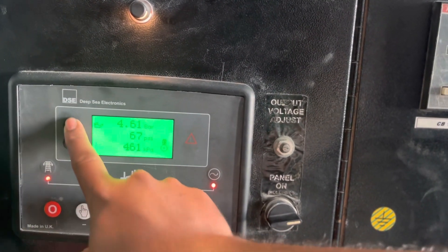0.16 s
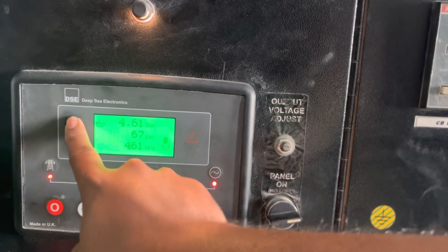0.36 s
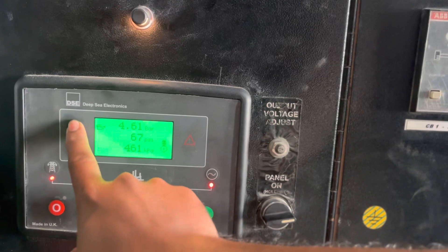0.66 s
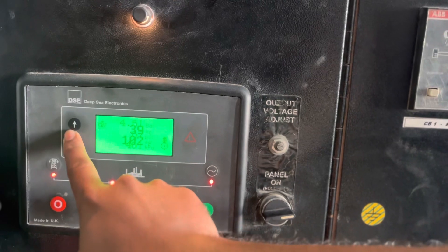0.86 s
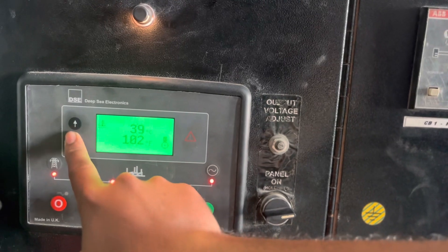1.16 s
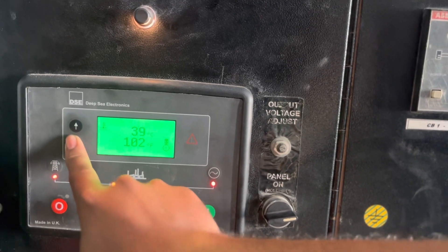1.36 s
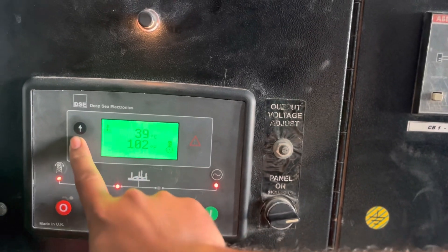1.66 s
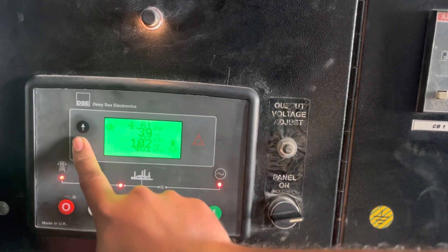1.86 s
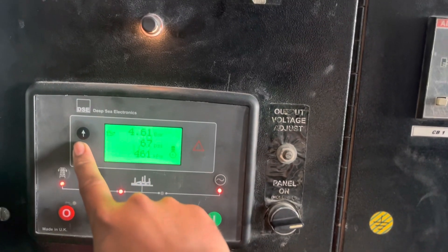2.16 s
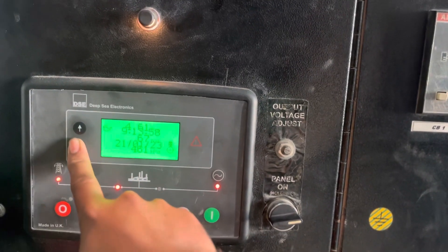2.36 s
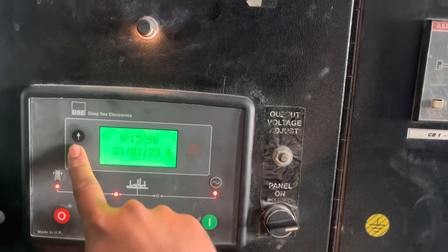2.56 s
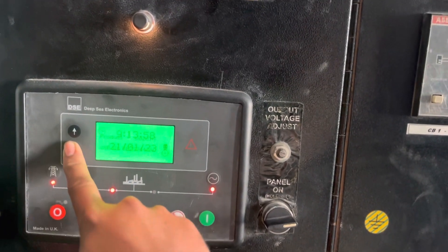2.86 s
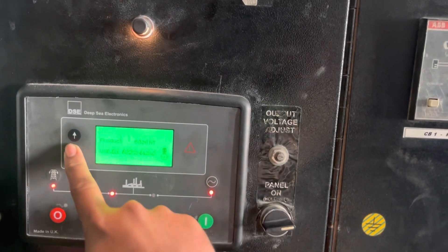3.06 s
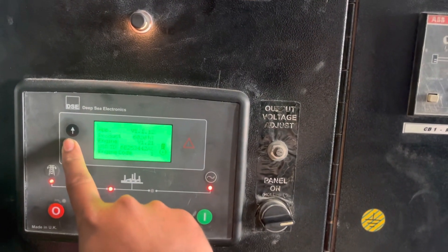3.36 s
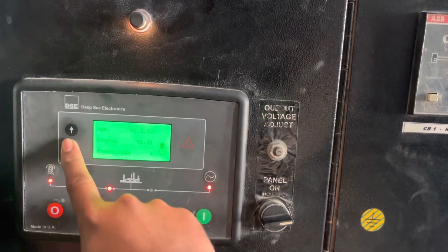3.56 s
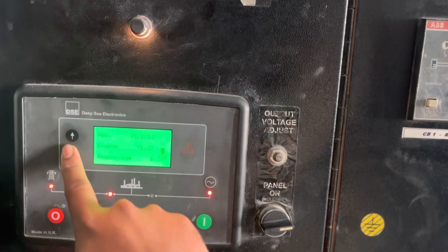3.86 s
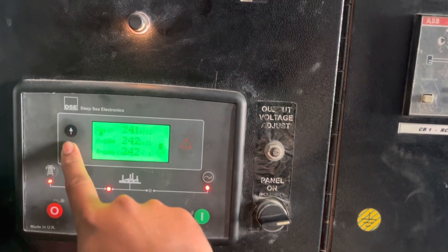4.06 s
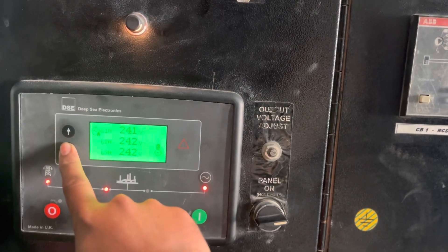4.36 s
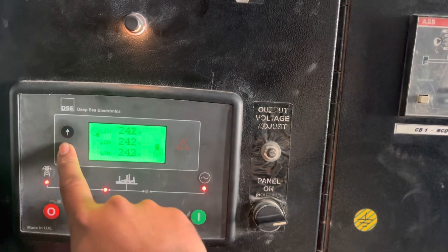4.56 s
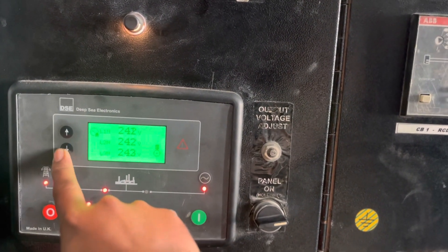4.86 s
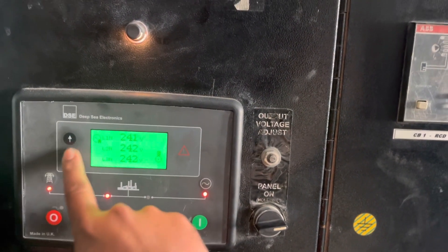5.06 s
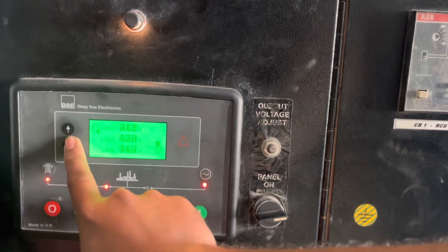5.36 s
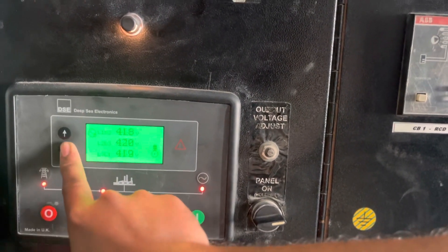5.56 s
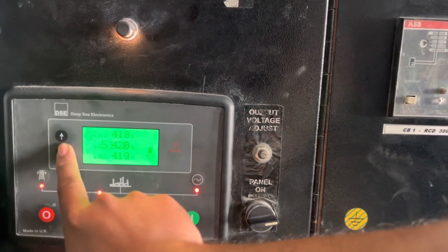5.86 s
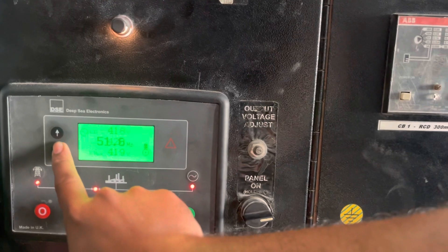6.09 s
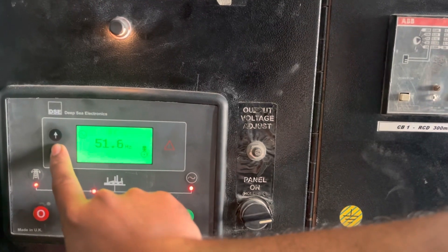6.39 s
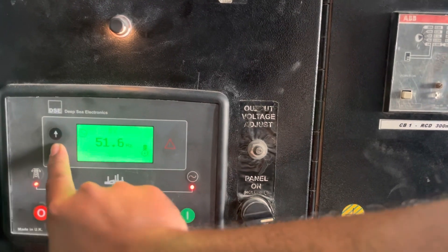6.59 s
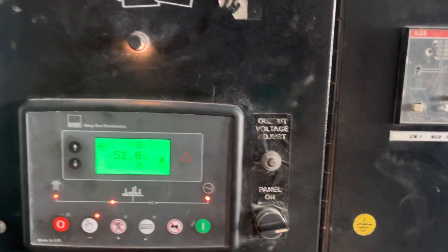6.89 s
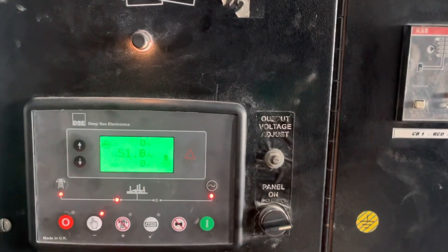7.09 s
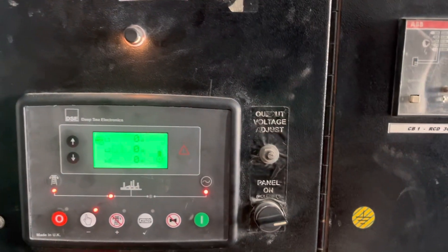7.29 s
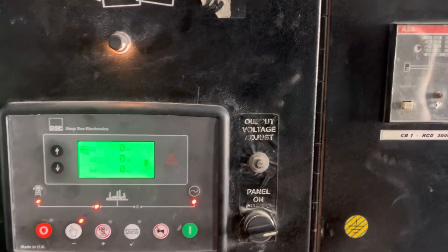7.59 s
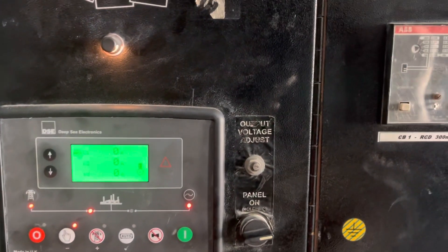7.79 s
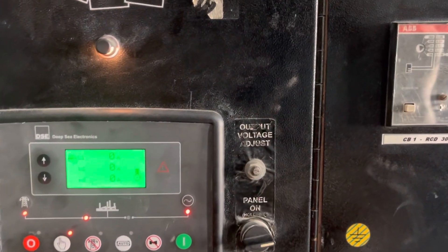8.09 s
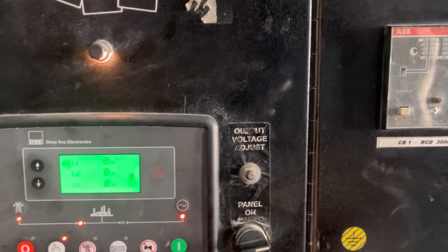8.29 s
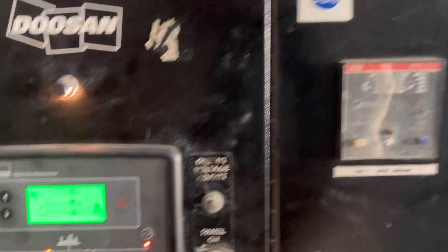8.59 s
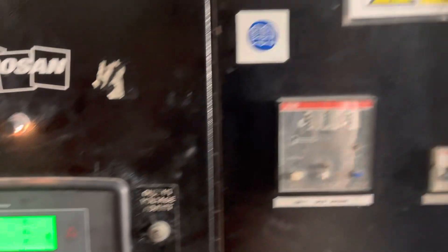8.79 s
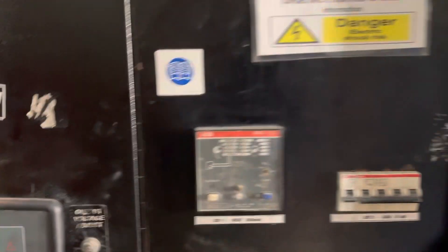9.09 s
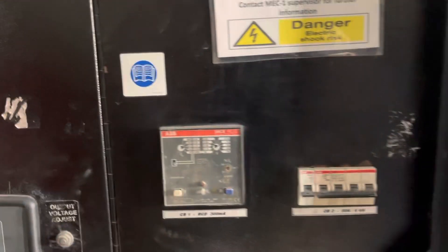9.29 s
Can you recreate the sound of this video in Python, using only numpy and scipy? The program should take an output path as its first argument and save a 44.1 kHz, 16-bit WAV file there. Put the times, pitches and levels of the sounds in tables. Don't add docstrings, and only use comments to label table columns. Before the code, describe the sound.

Close handheld stereo capture of a running diesel generator: steady low firing tones, coarse mechanical clatter, a wavering fan tone and turbulent air. A fine, bright metallic rattle repeats about twenty-six times a second, blending into a buzz. Pitch stays even throughout. After a faint tick and brushing near the seventh second, the microphone moves and the boom weakens during the last second.

```python
import sys
import numpy as np
from scipy import signal
from scipy.fft import rfft, irfft, next_fast_len
from scipy.io import wavfile
from scipy.ndimage import uniform_filter1d

SR = 44100
rng = np.random.default_rng(int(sys.argv[2]) if len(sys.argv) > 2 else 0)


def bounce(signal):
    frames = np.transpose(np.atleast_2d(signal))
    limited = np.clip(frames, -1, 1)
    pcm = np.round(limited * 32767).astype(np.int16)
    wavfile.write(sys.argv[1], SR, pcm)


def volts_from_decibels(level):
    exponent = np.asarray(level, float) / 20
    return 10 ** exponent


N = 416304
T = np.arange(N) / SR
CYCLE_HZ = 12.8997
LEFT_RIGHT = np.array([[1], [-1]])

# multiple, left level/dB, right level/dB
STRONG_ORDERS = [(4, -24, -24), (6, -33, -34), (7, -42, -41), (8, -28, -27), (11, -44, -43), (12, -38, -36),
                 (16, -30, -30), (17, -38, -37), (18, -38, -39), (20, -34, -31), (22, -43, -45),
                 (24, -50, -41), (28, -34, -31), (30, -32, -29), (31, -46, -37), (32, -30, -31),
                 (33, -39, -37), (34, -30, -29), (35, -45, -41), (36, -37, -30), (37, -45, -41),
                 (38, -31, -28), (39, -42, -38), (40, -30, -27), (41, -46, -43), (42, -39, -42),
                 (43, -42, -39), (44, -46, -40), (46, -46, -42), (50, -52, -42)]
# multiple, left level/dB, right level/dB
PANEL_ORDERS = [(53, -54.5, -51), (56, -50.5, -47), (65, -52, -51), (75.9, -55, -54), (104, -57, -58.5),
                (122.2, -58, -55.5)]
# t/s, share 0-1
SHIFT = [
    (5.5, 0),
    (6.7, 0.5),
    (7.2, 0.8),
]
# f/Hz, share
BOOM_SHARE = [(52, 0.043), (210, 0.49), (350, 0), (400, 1.17), (500, 1.47), (700, 0), (1200, 0)]
# f/Hz, coherence (clipped to 0-1 in the noise
COHERENCE = [(60, 1), (150, 3.5), (300, -1), (450, 2.7), (700, 0.95), (1200, -0.09), (1600, 0.56),
             (2600, 0.6), (3500, -0.08), (4700, 0), (6400, 0.44), (7800, 4.5), (8500, 8), (16000, -0.5)]


def evened(x):
    return x / np.sqrt(np.mean(abs(x) ** 2) + 1e-20)


def read(points, hz):
    f, value = np.transpose(points)
    return np.interp(np.log(hz + 1), np.log(f + 1), value)


def curve(points, t):
    return np.interp(t, *np.transpose(points))


def drift(per_s):
    t = np.arange(0, T[-1] + 1, 1 / per_s)
    a, b = rng.standard_normal((len(t), 2)).T
    coarse = T[::64]
    wander = np.interp(coarse, t, a) + 1j * np.interp(coarse, t, b)
    return np.repeat(evened(wander), 64)[:N]


def resonate(x, hz, width):
    r = np.exp(-np.pi * width / SR)
    return signal.lfilter([1 - r, 0, r - 1], [1, -2 * r * np.cos(2 * np.pi * hz / SR), r * r], x)


def ports(hz):
    # f/Hz, phase by which left leads/rad
    left_leads = [(50, -.2), (150, -.2), (230, -.5), (360, .4), (500, 1.15), (1900, 1.5), (2600, -.4),
                  (3500, 1.9), (4700, -.6), (5600, -3.1), (7200, -1.9), (8200, 0), (9900, 0), (11700, 3.14),
                  (13700, 3.14), (15300, 6.1)]
    return np.exp(.5j * read(left_leads, hz) * LEFT_RIGHT)


def boom_db(t):
    # t/s, level against usual/dB
    boom_level = [(0.0, -0.4), (0.6, -1.2), (1.1, 0), (2.9, 0), (3.4, 0.3), (4.5, 0), (6.7, 0),
                  (8.73, -3.5), (9.02, -6), (9.44, -5.5)]
    return curve(boom_level, t)


def hum_db(t):
    slide_s, slide_length_s = 8.6, .37
    shift_s = SHIFT[1][0]
    shifted = np.clip((t - shift_s) / (slide_s - shift_s), 0, 1)
    slid = np.clip((t - slide_s) / slide_length_s, 0, 1)
    return 2.1 * shifted - 4.5 * slid


def crank():
    # t/s, lead/ms
    clock_lead = [(0.0, -32.57), (1.2, -32.82), (3.1, -32.07), (4.1, -32.73), (5.7, -32.25), (6.6, -32.52),
                  (7.3, -32.25), (8.3, -32.5), (9.15, -33.5), (9.44, -33.55)]
    return CYCLE_HZ * (T + curve(clock_lead, T) / 1000)


def noise(spectrum, patchy_db, follow):
    # f/Hz, level difference/dB
    port_lean = [(60, -0.5), (110, -5), (200, -3), (380, 1), (700, -2.5), (1290, -3.5), (2380, -3),
                 (4400, -4), (8120, -2.5), (15000, -2)]
    frames, hz = N // 256 + 5, np.fft.rfftfreq(1024, 1 / SR)
    a, b, c, d, patches = rng.standard_normal((frames, 513, 5)).T
    patches = uniform_filter1d(patches, size=10, axis=0)
    patches = evened(uniform_filter1d(patches, size=12, axis=1))

    same = np.clip(read(COHERENCE, hz), 0, 1)[:, None]
    left = a + 1j * b
    right = same * left + np.sqrt(1 - same ** 2) * (c + 1j * d)
    z = np.array([left, right])
    z *= (ports(hz) * volts_from_decibels(.5 * read(port_lean, hz) * LEFT_RIGHT))[:, :, None]

    moved_db = follow * read(BOOM_SHARE, hz)[:, None] * boom_db(np.arange(frames) * 256 / SR)
    z *= volts_from_decibels(read(spectrum, hz)[:, None] + patchy_db * patches + moved_db)
    return evened(signal.istft(z, nperseg=1024, noverlap=768)[1][:, :N])


def firing(cycles):
    # t/ms, signed strength
    turn_blows = [(3.17, 0.53), (8.16, -0.96), (16.8, -0.31), (30.06, 0.7), (34.49, -0.7), (36.78, 1.0)]
    # t/ms, signed strength
    flipping_blows = [(9.01, -0.68), (18.5, -0.63), (26.99, 1.0), (34.19, 0.73)]
    slow, boom, hum = cycles[::8], boom_db(T[::8]), hum_db(T[::8])
    out = 0
    for k, left_db, right_db in STRONG_ORDERS + PANEL_ORDERS:
        k = round(k)
        hz = k * CYCLE_HZ
        ms, strength = np.transpose(flipping_blows if k % 2 else turn_blows)
        start = np.angle(np.sum(strength * np.exp(-2j * np.pi * hz * ms / 1000)))
        sway = 1 + min(0.0014 * k, .08) * drift(5.5)[::8]
        tone = sway * np.exp(2j * np.pi * k * slow + 1j * start)
        place_db = hum if k == 8 else read(BOOM_SHARE, hz) * boom
        out = out + (ports(hz) * volts_from_decibels([[left_db], [right_db]]) * tone).real * volts_from_decibels(place_db)
    return np.sqrt(2) * signal.resample_poly(out, 8, 1, axis=1)[:, :N]


def valves(cycles, count=2):
    # f/Hz, level of each/dB
    knock_levels = [(38, -52), (200, -59), (400, -43), (600, -48), (680, -54), (850, -52), (1050, -59.5),
                    (1220, -62), (1340, -60.5), (1580, -61), (1900, -62.5), (2800, -77.5), (4500, -82),
                    (7000, -130)]
    k = np.arange(4097)
    hz = k * CYCLE_HZ
    strong = np.isin(k, np.round(np.transpose(STRONG_ORDERS + PANEL_ORDERS)[0]))
    height = volts_from_decibels(read(knock_levels, hz) + 1.8 * rng.standard_normal((2, 4097)))
    height = height * ~strong * (k > 2)
    same = read(COHERENCE, hz)
    apart = np.sqrt(1 - np.clip(same, 0, 1) ** 2)

    out, at = np.zeros((2, N)), cycles % 1 * 8192
    for n in range(count):
        shared, own = np.exp(2j * np.pi * rng.random((2, 4097)))
        turn = np.array([shared, same * shared + apart * own])
        waveform = irfft(height * turn * ports(hz), 8192) * 4096 * np.sqrt(2)
        weight = .85 if n == 0 else .45 * drift(1.516).real
        out += weight * np.array([np.interp(at, np.arange(8192), row, period=8192) for row in waveform])
    return out * volts_from_decibels(0.3 * boom_db(T))


def fan():
    fan_hz = 36.67
    # multiple, level/dB, change after the shift/dB
    fan_orders = [(2, -42, -24), (3, -46, -3), (4, -39, 1.5), (5, -44, 0.5), (6, -40.5, 2), (8, -54.5, 2)]
    out, slow = 0, T[::8]
    for k, db, moved_db in fan_orders:
        waver = 1 + .3 * drift(1.2)[::8]
        tone = waver * np.exp(2j * np.pi * (k * fan_hz * slow + rng.random()))
        out = out + (ports(k * fan_hz) * tone).real * volts_from_decibels(db + moved_db * curve(SHIFT, slow))
    return np.sqrt(2) * signal.resample_poly(out, 8, 1, axis=1)[:, :N]


def rumble(cycles):
    # f/Hz, spectral level/dB
    rumble_spectrum = [(25, -26), (45, -25), (75, 6.5), (150, 0.5), (215, 0.5), (310, -6), (400, 0.5),
                       (480, 2.5), (600, -8), (800, -11), (1300, -26), (2500, -44)]
    throb = volts_from_decibels(0.36 * np.cos(4 * np.pi * (cycles - .05)))
    return volts_from_decibels(-31.5) * throb * noise(rumble_spectrum, patchy_db=2.0, follow=0.21)


def hiss():
    # f/Hz, spectral level/dB
    hiss_spectrum = [(500, -29), (900, 1), (1250, -7.5), (1600, -2.5), (2300, -10.5), (3600, -10),
                     (5500, -16.5), (7000, -20), (9100, -21.5), (10500, -24.5), (12500, -28), (16000, -38)]
    return volts_from_decibels(-40.5) * noise(hiss_spectrum, patchy_db=1.5, follow=0.37)


def rattle_db():
    frees_s, freeing_s = 0.65, 0.53
    stuck = np.exp(-np.maximum(T - frees_s, 0) / freeing_s)
    return -47 - 9 * stuck + 0.87 * boom_db(T) * curve(SHIFT, T)


def rattle(cycles):
    # f/Hz, width/Hz, level/dB, right minus left/dB, change after the shift/dB
    ring_modes = [(1570, 98, 1, 8, -15), (2660, 270, -5.5, 3, -6), (3310, 67, -8.5, -7, 3),
                  (3697, 85, -1.5, 3, -0.5), (3760, 1340, 5, 7.5, 0), (4560, 140, -3.5, 8, -6),
                  (4925, 66, -0.5, 2, -7), (5170, 800, -1, 8.5, 5), (6880, 660, -8, -7, -1),
                  (7320, 1260, -1, -1.5, 0.5), (8580, 1300, -4.5, 0, 1)]
    # t/ms, level/dB
    bounces = [
        (0, -0.5),
        (1.6, 0),
        (3.2, -4),
        (5.5, -3),
        (9.2, -2),
        (12, -7),
    ]
    hits = np.flatnonzero(np.diff(np.floor(2 * cycles)))
    chance = rng.standard_normal((len(hits), 2 * len(bounces) + 1))
    strength = volts_from_decibels(1.5 * chance[:, -1])
    knocks, starts = np.zeros(N + SR), np.zeros(N)
    starts[hits] = strength
    for n, (ms, db) in enumerate(bounces):
        bounce_ms = ms + .045 * (n > 0) * chance[:, 2 * n]
        at = hits + np.abs(bounce_ms * SR / 1000).astype(int)
        knocks[at] += strength * volts_from_decibels(db + 1.1 * chance[:, 2 * n + 1])

    shared, left, right = rng.standard_normal((3, N))
    buzz_decay = signal.lfilter([1], [1, -np.exp(-1 / (0.011 * SR))], starts)
    buzz = buzz_decay * (shared + 0.91 * np.array([left, right]))
    drive = evened(knocks[:N]) * 0.87 + evened(buzz) * 0.57

    out, moved = 0, curve(SHIFT, T)
    for hz, width, db, lean_db, moved_db in ring_modes:
        ring = evened(resonate(resonate(drive, hz, 3 * width), hz, width))
        out = out + volts_from_decibels([[db - lean_db / 2], [db + lean_db / 2]]) * volts_from_decibels(moved_db * moved) * ring

    size = next_fast_len(N)
    hz = np.fft.rfftfreq(size, 1 / SR)
    out = irfft(rfft(out, size) * ports(hz) / (1 + (hz / 11000) ** 12), size)[:, :N]
    return evened(out) * volts_from_decibels(rattle_db())


def touches():
    # t/s, level/dB, f/Hz, length/s, left minus right/dB
    hand_touches = [
        (6.737, -53, 10500, 0.0044, -1),
        (6.77, -45.5, 1120, .13, -4),
        (6.788, -47, 810, 0.11, 0),
        (6.843, -57, 3300, .07, 4),
        (7.025, -50, 2280, .04, 12),
        (7.027, -51, 3450, .03, 6),
    ]
    out = np.zeros((2, N))
    for s, db, hz, length, lean_db in hand_touches:
        n, at = round(length * SR), round(s * SR)
        width = min(330 * (.035 / length) ** 2, 8000)
        grit = rng.standard_normal(8000)
        puff = evened(resonate(resonate(grit, hz, width), hz, width)[-n:])
        level = volts_from_decibels([[db + lean_db / 2], [db - lean_db / 2]])
        out[:, at:at + n] += level * puff * signal.windows.tukey(n, .4)
    return out


def scene():
    cycles = crank()
    engine = firing(cycles) + valves(cycles)
    air = fan() + rumble(cycles) + hiss()
    return engine + air + rattle(cycles) + touches()


def roll_off(x):
    return signal.sosfilt(signal.butter(12, 16930, fs=SR, output="sos"), x)


def record(dry):
    edge_hz = 15740
    limit = signal.firwin(1023, edge_hz, window=("kaiser", 12), fs=SR)
    mix = signal.oaconvolve(dry, limit[None], "same")
    return roll_off(mix)


dry = scene()
out = record(dry)
bounce(out)
```